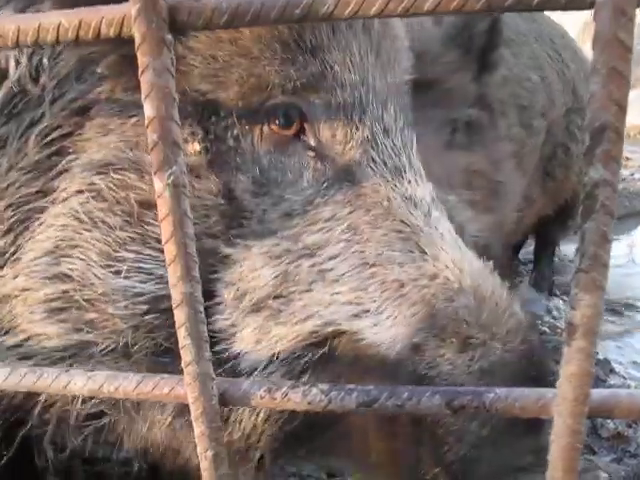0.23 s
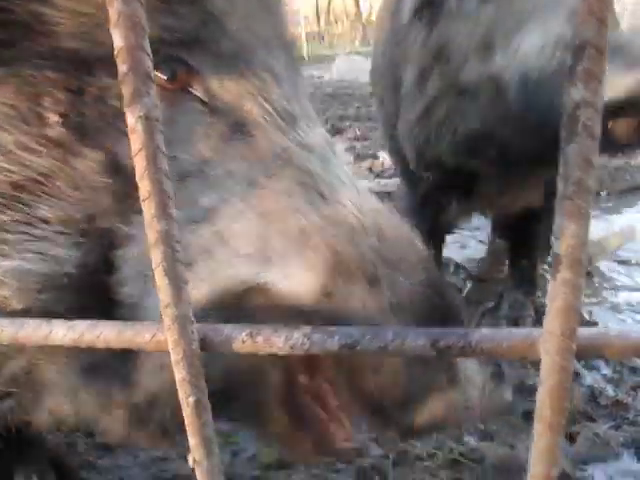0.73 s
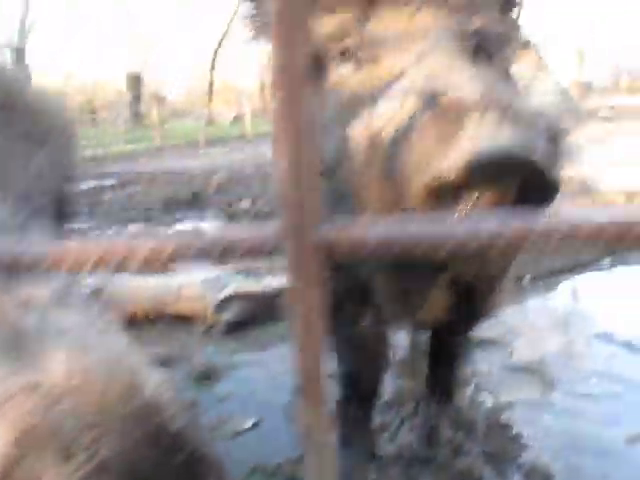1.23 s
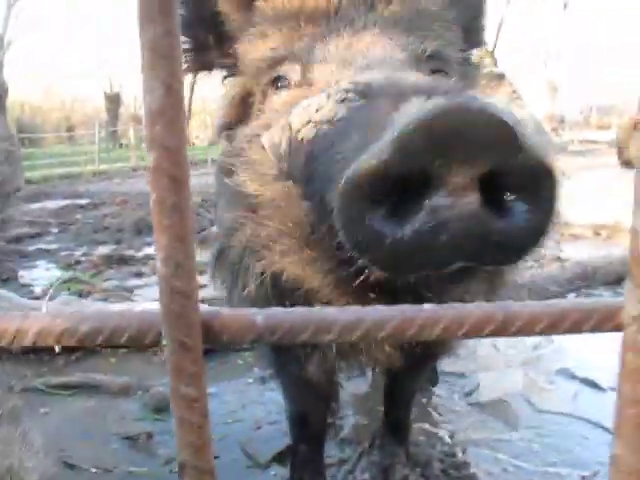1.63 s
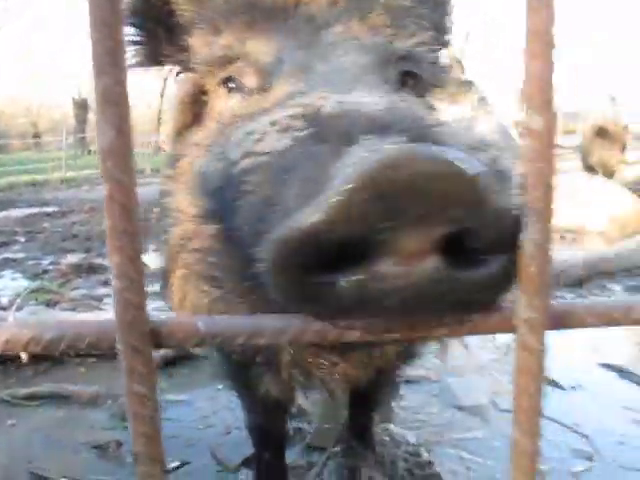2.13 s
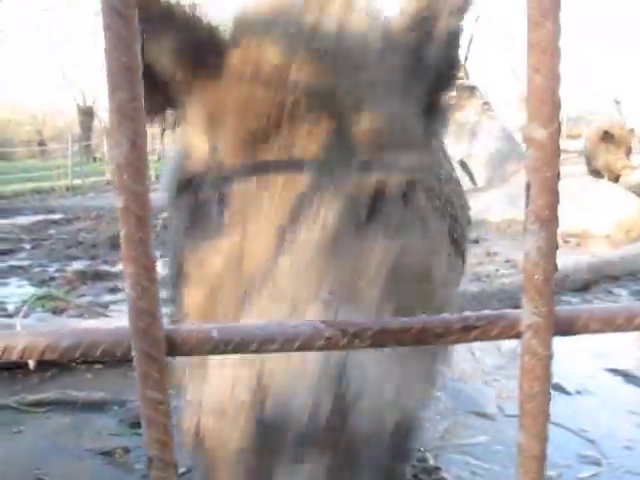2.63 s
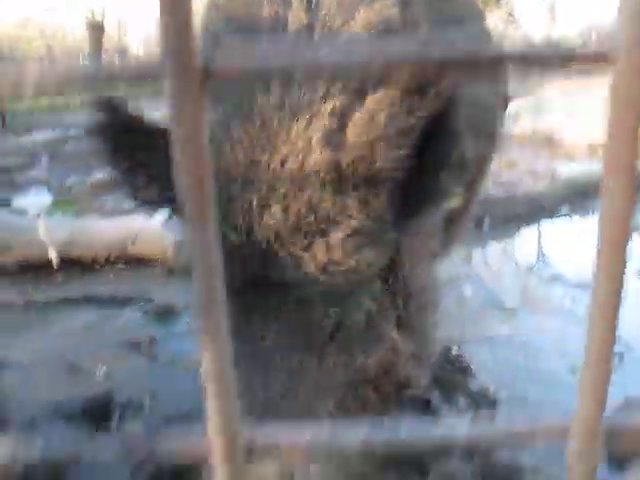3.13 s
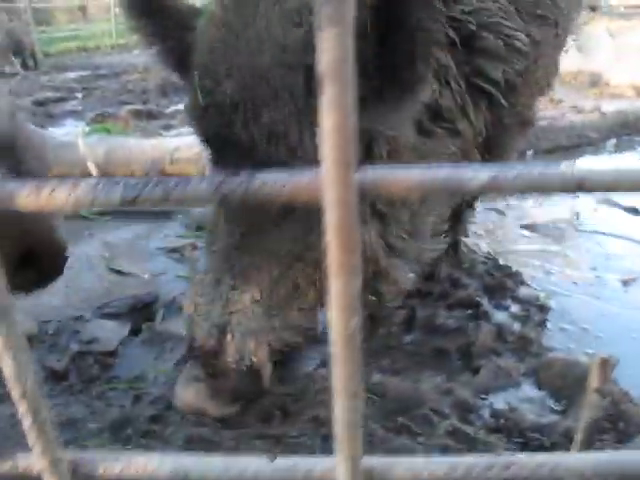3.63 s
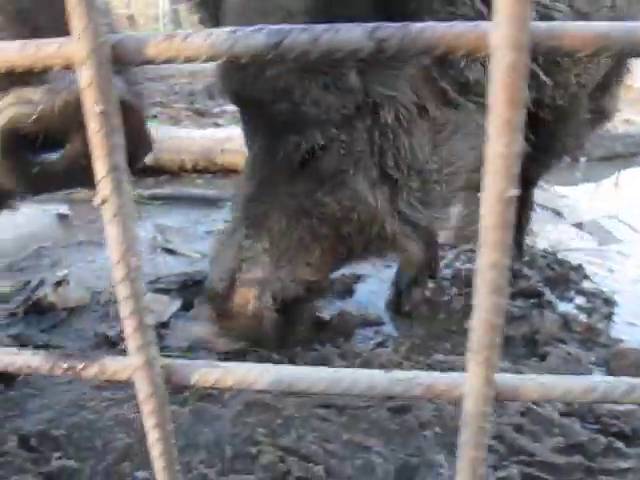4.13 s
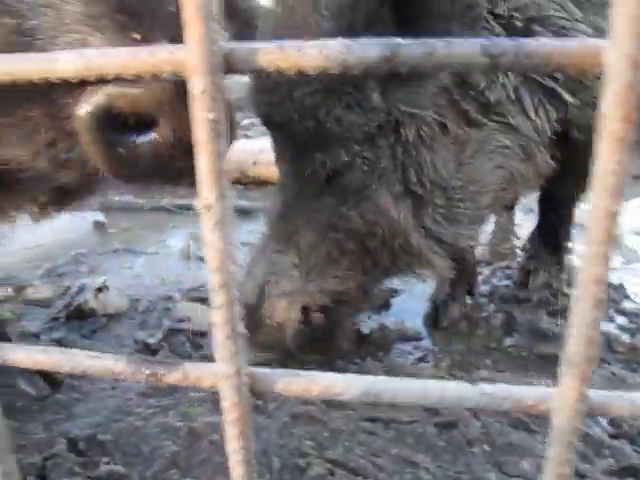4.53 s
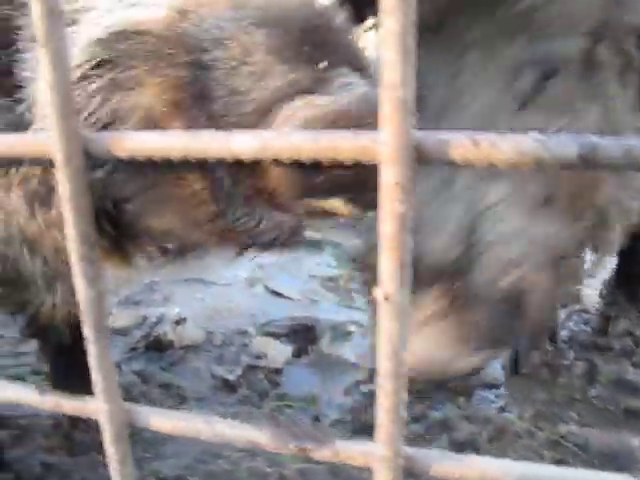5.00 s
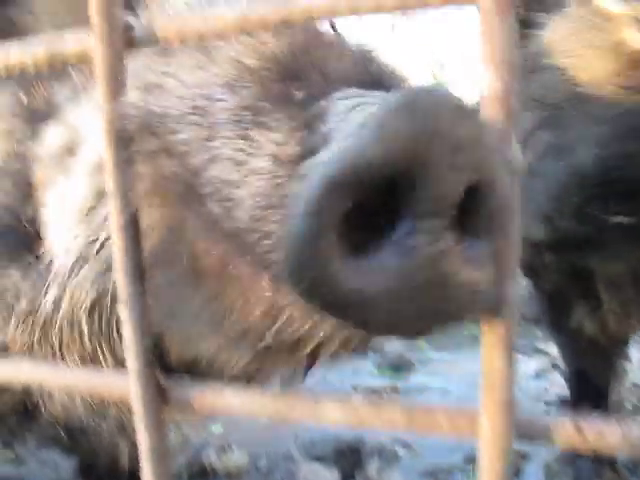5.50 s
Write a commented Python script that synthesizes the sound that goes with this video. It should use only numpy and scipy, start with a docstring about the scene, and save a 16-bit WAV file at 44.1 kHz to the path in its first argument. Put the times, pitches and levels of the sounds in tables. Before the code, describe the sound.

Sloppy wet chewing and muddy squelching from boars very near the microphone, thinning out midway, broken by airy snout blows.

```python
"""Wild boars chew and root in a muddy puddle, behind the bars of an outdoor pen.
Lip ticks and jaw smacks: short damped rings, fizzle and spray. Air pockets: damped cavity tones with wet noise.
Each push swells swarms of bubble tones, squelch and crackle over noise, then they settle.
Four snorts: shaped noise with a nostril resonance. Faint sinking sine whistles; steady open-air noise and hum."""
import sys
import numpy as np
from scipy import signal
from scipy.fft import rfft, irfft, next_fast_len
from scipy.io import wavfile
from scipy.ndimage import map_coordinates

SR = 44100
rng = np.random.default_rng(int(sys.argv[2]) if len(sys.argv) > 2 else 0)


def inscribe(sig):
    """Save sig as 16-bit PCM at rate SR to the path in sys.argv[1].

    A 1-D sig is mono; a 2-D sig holds one channel per row.
    Samples are clipped to [-1, 1] before scaling.
    """
    pcm = np.round(np.clip(np.atleast_2d(sig).T, -1, 1) * 32767)
    wavfile.write(sys.argv[1], SR, pcm.astype(np.int16))


N = 254016


def amp(db):
    """Decibels to gain."""
    return 10 ** (np.asarray(db) / 20)


def unit(x):
    """Scale to rms 1."""
    return x / np.sqrt(np.mean(x ** 2) + 1e-20)


def along(points, hz):
    """Read (frequency, value) points on a log-frequency axis."""
    f, v = np.transpose(points)
    return np.interp(np.log(hz + 1), np.log(f), v)


def wobble(knots_per_s):
    """Smooth random curve through normally distributed knots."""
    knots = rng.standard_normal(int(N * knots_per_s / SR) + 4)
    return map_coordinates(knots, [np.arange(N) * knots_per_s / SR])


def coloured(x, points):
    """Minimum-phase filter with the gain of (frequency [Hz], gain [dB]) points."""
    size = 2 * next_fast_len(len(x))
    gain = amp(along(points, np.fft.rfftfreq(size, 1 / SR)))
    # folding the cepstrum makes the filter causal
    cepstrum = irfft(np.log(gain))
    cepstrum[1:size // 2] *= 2
    cepstrum[size // 2 + 1:] = 0
    response = np.exp(rfft(cepstrum))
    return irfft(rfft(x, size) * response)[:len(x)]


def noise(points):
    """Noise of rms 1 with the given spectrum."""
    return unit(coloured(rng.standard_normal(N), points))


def fade(t, t60_s):
    """Exponential decay by 60 dB in t60_s."""
    return np.exp(-np.log(1000) * t / t60_s)


def ring(t, hz, t60_s, attack_s, rise=0):
    """Damped cavity tone; a positive rise makes the pitch climb as the cavity shrinks."""
    cycles = hz * (t + rise * t * np.minimum(t / t60_s, 1) / 2)
    return np.sin(2 * np.pi * cycles) * fade(t, t60_s) * (1 - np.exp(-t / attack_s))


def burst(x):
    """Give a short sound the energy of 3 ms at rms 1."""
    return x * np.sqrt(.003 * SR / np.sum(x ** 2))


def low_cut(x, hz):
    """Small sources radiate little below hz."""
    return signal.sosfilt(signal.butter(4, hz, "high", fs=SR, output="sos"), x)


def scattered(x, t60_s, wet_db):
    """Add the brief scatter off head, bars and puddle: a decaying noise tail."""
    t = np.arange(len(x)) / SR
    tail = rng.standard_normal(len(x)) * fade(t, t60_s) * np.minimum(t / .001, 1)
    tail /= np.linalg.norm(tail)
    return x + amp(wet_db) * signal.fftconvolve(x, tail)[:len(x)]


def add(track, s, x):
    """Mix x into the track at time s."""
    start = max(round(s * SR), 0)
    track[start:start + len(x)] += x[:max(N - start, 0)]


# smacks, a wet film snaps and the pocket behind it pops open:
# (time [s], snap [dB], spray [dB], pop [dB], cavity [Hz], t60 [s])
SMACKS = [(0.1259, -20, -15, -25, 1112, 0.019), (0.2097, -28, -23.5, -24, 1656, .04),
          (0.3009, -15, -12, -22.5, 1590, 0.03), (0.552, -32, -33, -28, 1226, .05),
          (0.7345, -24.5, -24.5, -29.5, 570, 0.017), (1.0153, -18, -29, -17, 1582, 0.047),
          (1.0344, -21.5, -31, -28, 840, 0.015), (1.0608, -30, -24.5, -32, 543, 0.023),
          (1.1053, -25, -32, -22, 797, .057), (1.3051, -43, -38, -28, 1040, .007),
          (1.491, -28, -32, -17, 1114, 0.0084), (1.498, -20.5, -35, -20.5, 1110, 0.011),
          (1.9125, -28, -38, -27.5, 1093, 0.031), (1.9416, -20, -23.5, -19, 1315, 0.0066),
          (2.092, -27, -12.5, -22.5, 1340, 0.023), (2.412, -10, -18, -21, 1470, 0.0028),
          (2.423, -25.5, -30, -25.5, 835, 0.017), (3.144, -53, -36, -23.5, 1070, 0.0078),
          (3.7393, -39, -41, -16.5, 944, .011), (4.0089, -54, -38, -39, 1130, 0.0026),
          (4.3972, -47, -46, -22.5, 712, 0.0092), (4.5483, -44, -38, -33.5, 1580, 0.0024),
          (4.9447, -24.5, -28, -19, 1264, 0.023), (5.322, -39, -38, -32, 1406, .02),
          (5.37, -38, -42, -38.5, 1110, 0.0045), (5.552, -31.5, -30, -24.5, 1090, .011)]
# lips unsticking, small films with no pocket: (time [s], ring [dB], ring [Hz], spray [dB])
TICKS = [(0.0808, -25.5, 2500, -24), (0.338, -25, 2580, -17.5), (1.0114, -29, 2560, -39),
         (1.0227, -26, 2630, -42), (1.2654, -25, 3500, -25), (1.658, -42, 5100, -28.5),
         (1.7004, -52, 3220, -21.5), (1.7077, -50, 3690, -25), (1.7216, -53, 4770, -22.5),
         (1.7684, -31, 1920, -23), (1.8462, -37, 3620, -21), (1.8883, -46, 3170, -22.5),
         (1.9022, -34, 4500, -21.5), (1.979, -40, 3400, -24.5), (2.1133, -29, 3770, -17),
         (2.129, -36, 4280, -25), (2.1534, -29, 3370, -16), (2.1624, -46, 4600, -25),
         (2.196, -45, 4250, -22.5), (2.4107, -21.5, 3940, -28), (2.8312, -46, 5000, -27),
                  (3.0633, -38, 3350, -31.5), (3.6251, -40, 3160, -31), (3.9253, -36, 2110, -33),
         (4.098, -46, 3340, -28), (4.172, -39, 4820, -28), (4.198, -38, 3940, -19.5),
         (4.204, -29, 2620, -18), (4.2304, -38, 3980, -22.5), (4.3763, -43, 3400, -31),
                  (5.385, -37, 3220, -44), (5.486, -35.5, 3240, -31), (5.4958, -33, 3380, -29),
         (5.506, -24.5, 3060, -20.5), (5.5187, -25, 3550, -27), (5.5376, -33, 4960, -22.5),
         (5.583, -41, 2920, -44)]
MOUTH_HZ = 2627  # gap between the jaws, nearly alike in every smack


def films():
    """Every snapping film as (s, ring dB, ring Hz, spray dB): smacks ring the mouth, ticks their own gap."""
    mouth = []
    for s, snap_db, spray_db, *_ in SMACKS:
        mouth.append((s, snap_db, MOUTH_HZ * rng.uniform(.95, 1.05), spray_db))
    return mouth + TICKS


# fine spray of a bursting film, relative spectrum: (frequency [Hz], density [dB per Hz])
SPRAY = [(200, -6), (1000, -28), (3000, 2), (5000, 2), (6800, 1.5), (8000, 4.5), (9500, 5.5)]


def clicks(second_db=-10, wet_db=-9, peel_db=-19, peel_t60_s=0.018):
    """Each film stretches with a faint fizzle, snaps with a puff of spray and rings the small gap behind it."""
    lead = SR // 100
    out, since = np.zeros(N), np.arange(-lead, SR // 20) / SR
    t = np.maximum(since, 0)
    for s, ring_db, hz, spray_db in films():
        gap = burst(ring(t, hz, t60_s=.0042, attack_s=.0004))
        second_hz = hz * rng.uniform(1.2, 1.31)
        gap += amp(second_db) * burst(ring(t, second_hz, t60_s=0.0041, attack_s=.0001))
        # fizzle swells before the snap and fades after it
        stretch = rng.standard_normal(len(t)) * fade(np.abs(since), peel_t60_s)
        stretch = coloured(stretch, [(hz / 2, -12), (hz, 0), (hz * 2, -10)])
        gap += amp(peel_db) * burst(stretch)
        puff = rng.standard_normal(len(t)) * fade(t, t60_s=.0036) * (since >= 0)
        puff = coloured(puff, SPRAY)
        snap = amp(ring_db) * burst(gap) + amp(spray_db) * burst(puff)
        snap = scattered(low_cut(snap, 520), t60_s=0.028, wet_db=wet_db)
        add(out, s - lead / SR, snap)
    return out


# large air pockets gulping shut in the mud: (time [s], level [dB], cavity [Hz])
GULPS = [(0.114, -29.5, 523), (0.1386, -30, 1115), (0.327, -35.5, 174), (0.4652, -28.5, 1895),
         (0.562, -39, 676), (0.7613, -36.5, 657), (1.308, -32.5, 490), (1.662, -37, 330),
         (1.679, -37.5, 370), (1.743, -30.5, 1240), (2.012, -37.5, 780), (2.21, -35, 1610),
         (2.254, -36.5, 1640), (2.457, -32.5, 790), (2.5237, -27.5, 1037), (2.5487, -29, 1710),
         (2.5715, -26.5, 2000), (2.868, -32.5, 1004), (2.938, -35.5, 1150), (2.9641, -28, 1400),
         (3.2301, -29, 476), (3.247, -36, 2650), (3.3054, -31, 996), (3.321, -37.5, 700),
         (3.7466, -25.5, 1090), (3.769, -30, 760), (3.801, -37, 470), (3.81, -33, 797), (3.889, -35, 1770),
         (4.3516, -30, 850), (4.353, -35, 1280), (4.625, -37.5, 2220), (4.959, -32, 1160),
         (4.9801, -26.5, 474)]
GULP_T60_S = 0.034  # soft mud damps them all alike


def pockets():
    """Every air pocket as (s, dB, cavity Hz, t60 s): one behind each smack, and the gulps in the mud."""
    pops = [(s, pop_db, hz, t60_s) for s, _, _, pop_db, hz, t60_s in SMACKS]
    gulps = [(s, db, hz, GULP_T60_S) for s, db, hz in GULPS]
    return pops + gulps


def plops(lower_db=-12, upper_db=-7, smear_db=-10, drawn_db=4, peel_db=-17, peel_t60_s=0.039):
    """A pocket peels open, then rings: main tone, side cavities below and above it, and a wet smear."""
    lead = SR // 50
    out, since = np.zeros(N), np.arange(-lead, SR // 10) / SR
    t = np.maximum(since, 0)
    for s, db, hz, t60_s in pockets():
        cavity = burst(ring(t, hz, t60_s, attack_s=0.002, rise=0.031))
        lower_hz = hz * rng.uniform(0.69, 0.915)
        cavity += amp(lower_db) * burst(ring(t, lower_hz, t60_s, attack_s=0.00054))
        upper_hz = hz * rng.uniform(1.067, 1.557)
        cavity += amp(upper_db) * burst(ring(t, upper_hz, t60_s * 1.16, attack_s=0.0029))
        # slow opening squelches, quick one pops cleanly
        smear_gain = amp(smear_db + drawn_db * np.log2(t60_s / 0.013))
        smear = smear_gain * burst(fade(t, t60_s) * (1 - np.exp(-t / 0.0013)))
        peel = amp(peel_db) * burst(fade(np.abs(since), peel_t60_s))
        wet_spectrum = [(hz * 0.26, -18), (hz, 0), (hz * 2, -1), (hz * 6, -22)]
        wet = unit(coloured(rng.standard_normal(len(t)), wet_spectrum))
        sound = low_cut(cavity + (smear + peel) * wet, min(hz * .78, 600))
        add(out, s - lead / SR, amp(db) * burst(scattered(sound, t60_s=0.036, wet_db=-7.5)))
    return out


# pushes that churn the mud, before mix trims:
# (time [s], squelch [dB], fizz over squelch [dB], settling t60 [s])
PUSHES = [(0.049, -36, 0, 2), (0.12, -38, -9.5, 2.8), (0.3, -36.5, 5, 1.53), (0.55, -45, -9, 0.17),
          (0.69, -42, -3, 0.85), (0.992, -41, 0.5, 1), (1.6, -43, -5.5, 0.68), (1.78, -35, 2.5, 0.52),
          (1.91, -39, 1.5, 0.92), (2.1, -42, 1, 1.1), (2.18, -46.5, 8.5, 1.27), (2.54, -39.5, -3.5, 0.83),
          (3.07, -50, 3, 3.4), (3.25, -47.5, 1, 1.1), (3.64, -49, -6.5, 0.79), (3.74, -41, 1, 0.35),
          (4.02, -55.5, 10, 0.94), (4.21, -43.5, 11, 0.45), (4.31, -40.5, 5.5, 1.04), (4.62, -56.5, 9, 1.8),
          (5.33, -45.5, 4, 0.77), (5.51, -46, 3, 0.25)]
PUSH_RISE_S = 0.21  # time to build by 60 dB
SEEP_SQUELCH_DB, SEEP_FIZZ_DB = -56, -53  # the mud is never quite still
BUBBLE_TRADE = 0.32  # shallow, fizzy push traps less air: dB of bubbles lost per dB of fizz
# bubbles grow more slowly than the push (exponent) and surface after it
BUBBLE_DB, BUBBLE_EXPONENT, BUBBLE_LAG_S = -12, .85, .008


def churning():
    """Gains of bubbles, squelch and fizz: each push builds quickly and settles slowly, on top of the seeping."""
    now = np.arange(N) / SR
    power = amp([[SEEP_SQUELCH_DB], [SEEP_SQUELCH_DB], [SEEP_FIZZ_DB]]) ** 2
    for s, db, fizz_db, t60_s in PUSHES:
        push = amp(db) * fade(np.abs(now - s), np.where(now < s, PUSH_RISE_S, t60_s))
        shares = amp([[-BUBBLE_TRADE * fizz_db], [0], [fizz_db]])
        power = power + (shares * push) ** 2
    trapped, squelch, fizz = np.sqrt(power)
    surfacing = np.interp(now - BUBBLE_LAG_S, now, trapped)
    return amp(BUBBLE_DB) * surfacing ** BUBBLE_EXPONENT, squelch, fizz


def grains(per_s, low_hz, high_hz, cycles, spread_db, rise):
    """Swarm of tiny bursting bubbles of uneven size, each a short rising ring; rms 1."""
    count = int(per_s * N / SR)
    when, pitch, size, life = rng.random((count, 4)).T[:, :, None]
    hz = low_hz * (high_hz / low_hz) ** pitch
    t = np.arange(int(1.5 * cycles * SR / low_hz)) / SR
    size_db = spread_db * np.minimum(-np.log(1 - size), np.pi)
    strength = amp(size_db) * np.sqrt(hz / low_hz)
    waves = strength * ring(t, hz, cycles * (.5 + life) / hz, .5 / hz, rise)
    index = (when * N).astype(int) + np.arange(len(t))
    return unit(np.bincount(index.ravel(), waves.ravel(), N)[:N])


def crackle(per_s, spread_db):
    """Sparse, sharp crackle of tiny bursting films: scattered random impulses, rms 1."""
    size = amp(spread_db * np.minimum(rng.exponential(size=N), np.pi)) * rng.choice([-1, 1], N)
    impulses = (rng.random(N) < per_s / SR) * size
    return unit(coloured(scattered(impulses, t60_s=0.036, wet_db=2.0), SPRAY))


def clumped(x, clump_db, clumps_per_s):
    """Bunch a swarm by a random level curve, rms 1."""
    return unit(x * amp(clump_db * wobble(clumps_per_s)))


def mud(clump_db=2, clumps_per_s=28):
    """Churning makes round bubbles, smaller squelching ones and a fine fizz, each in clumps, over noise."""
    bubble_gain, squelch_gain, fizz_gain = churning()
    stir_db = 1.6 * wobble(45)
    bubbles = grains(per_s=220, low_hz=700, high_hz=2050, cycles=22, spread_db=4.5, rise=.15)
    bubbles = clumped(bubbles, clump_db, clumps_per_s)
    bubbles += amp(-4) * noise([(100, -18), (300, -6), (700, -2), (1700, 0), (2600, -20)])
    squelch = grains(per_s=520, low_hz=1600, high_hz=4000, cycles=6, spread_db=5.5, rise=.1)
    squelch = clumped(squelch, clump_db, clumps_per_s)
    squelch += amp(-2) * noise([(1000, -34.0), (2000, 5), (3200, 8.0), (4800, -2.0), (7000, -3.5)])
    fizz = clumped(crackle(per_s=240, spread_db=6), clump_db, clumps_per_s)
    fizz += amp(-8) * noise([(2500, -11), (5000, 2.0), (9500, 4.5)])
    mix = bubble_gain * bubbles
    mix += amp(-2.0) * squelch_gain * squelch
    mix += amp(2.3) * fizz_gain * fizz
    return amp(stir_db) * mix


SNORT_ATTACK_S, SNORT_RELEASE_S = 0.049, 0.028


def snort(row, spectrum, width_octaves=0.31):
    """Air rushes through a wet nostril whose resonance moves as it flexes."""
    start, end, db, swell_db, first_hz, last_hz, glide_s, nostril_db = row
    now = np.arange(N) / SR
    hz, t, z = signal.stft(noise(spectrum), SR, nperseg=512)
    nostril_hz = np.interp(t, [start, start + glide_s], [first_hz, last_hz])
    distance_octaves = np.log2((hz[:, None] + 1) / nostril_hz)
    peak = np.exp(-.5 * (distance_octaves / width_octaves) ** 2)
    air = unit(signal.istft(z * amp(nostril_db * peak), SR, nperseg=512)[1][:N])
    flutter_db = .8 * wobble(60)
    blowing = np.clip(np.minimum((now - start) / SNORT_ATTACK_S, (end - now) / SNORT_RELEASE_S), 0, 1)
    level_db = db + np.interp(now, [start, end], [0, swell_db]) + flutter_db
    return blowing * amp(level_db) * air


# blows through the snout: (start [s], end [s], starting level [dB], swell [dB],
# first nostril [Hz], last nostril [Hz], glide [s], resonance [dB])
SNORTS = [(1.063, 1.545, -31.5, 5, 2870, 2780, .2, 7), (2.423, 2.926, -41.5, 6.5, 2500, 4700, 0.45, 4),
          (4.797, 5.254, -34, 1, 4300, 2960, 0.11, 9), (5.721, 5.81, -37, 9, 2900, 3300, .05, 8)]
# air noise by nostril aim, relative spectra: (frequency [Hz], density [dB per Hz])
SNOUT_FORWARD = [(100, -17), (400, -4.5), (800, -0.5), (1800, -1), (2800, -2.5), (5000, -1.5), (7500, -6),
                 (9500, 2)]
# nostrils down: (frequency [Hz], density [dB per Hz])
SNOUT_DOWN = [(60, -27), (170, -6.5), (450, -1), (1000, -1), (1800, -9), (3000, -2.5), (5000, -3.5),
              (7500, -6), (9500, -4)]
# nostrils level: (frequency [Hz], density [dB per Hz])
SNOUT_LEVEL = [(60, -21), (170, -3.5), (450, -1.5), (1000, 1), (1800, -3), (3000, -4.5), (5000, -3.5),
               (7500, -5.5), (9500, -2)]


def snorts():
    """Four blows through the snout, coloured by nostril aim: forward, down, then level twice."""
    aims = [SNOUT_FORWARD, SNOUT_DOWN, SNOUT_LEVEL, SNOUT_LEVEL]
    return sum(snort(row, spectrum) for row, spectrum in zip(SNORTS, aims))


# thin sinking whistles: (start [s], end [s], start pitch [Hz], end pitch [Hz], level [dB])
WHISTLES = [(4.03, 4.17, 4520, 4400, -53), (4.44, 4.55, 8350, 7900, -50), (4.55, 4.92, 7950, 7350, -54),
            (5.675, 5.73, 2750, 2500, -47)]


def whistle():
    """Faint, unsteady high sine tones that swell, fade and sink in pitch."""
    out = np.zeros(N)
    for start, end, start_hz, end_hz, db in WHISTLES:
        progress = np.clip((np.arange(N) / SR - start) / (end - start), 0, 1)
        hz = start_hz + (end_hz - start_hz) * progress + 130 * wobble(900)
        swell = np.sqrt(np.abs(np.sin(np.pi * progress))) * amp(3 * wobble(50))
        out += swell * amp(db) * np.sin(2 * np.pi * np.cumsum(hz) / SR)
    return out


# open-air background, relative spectrum: (frequency [Hz], density [dB per Hz])
OUTDOORS = [(20, -7), (50, 5.5), (100, 5), (170, 1), (300, -1), (600, -1), (1200, -3), (2800, -9),
            (5000, -6), (7500, -10.5), (9500, -6)]


def outdoors():
    """Steady open-air noise with a faint, wavering low hum."""
    hum_gain = amp(-71.5 + 1.4 * wobble(4.05))
    hum_hz = 101 + 5 * wobble(14)
    hum = hum_gain * np.sin(2 * np.pi * np.cumsum(hum_hz) / SR)
    return amp(-51.0 + 0.25 * wobble(3.7)) * noise(OUTDOORS) + hum


def scene():
    """Sum all layers into one channel."""
    return (clicks() + plops() + mud() + snorts() + whistle() + outdoors())[None]


# microphone treble with a port notch: (frequency [Hz], gain [dB])
MICROPHONE = [(9600, 2.5), (10200, 0), (10800, -6.5), (11300, -13), (11800, -33), (12300, -19),
              (13000, -17), (15800, -30)]
TOP_HZ = 16100  # nothing passes from here up
OVERLOAD_LEVEL = .72  # linear ceiling


def record(dry, start_s=.036):
    """The microphone colours the treble and limits peaks softly; the sound starts a moment late."""
    x = coloured(dry[0], MICROPHONE) * (np.arange(N) / SR > start_s)
    x = x / (1 + np.abs(x / OVERLOAD_LEVEL) ** 10) ** (1 / 10)
    passed = np.fft.rfftfreq(N, 1 / SR) < TOP_HZ
    return irfft(rfft(x) * passed, N)[None]


dry = scene()
out = record(dry)
inscribe(out)
```